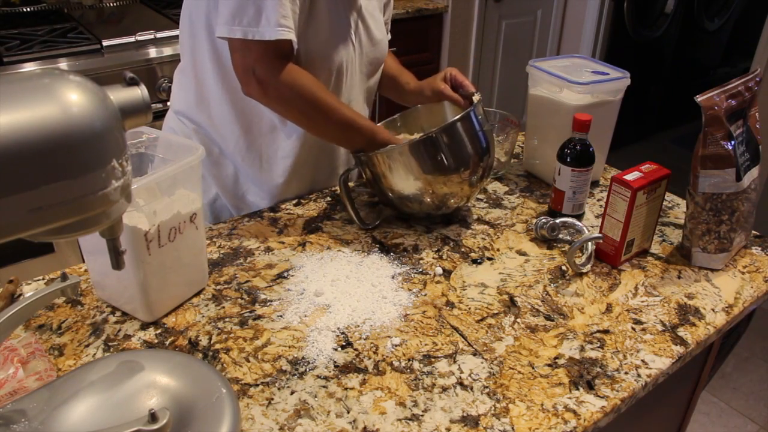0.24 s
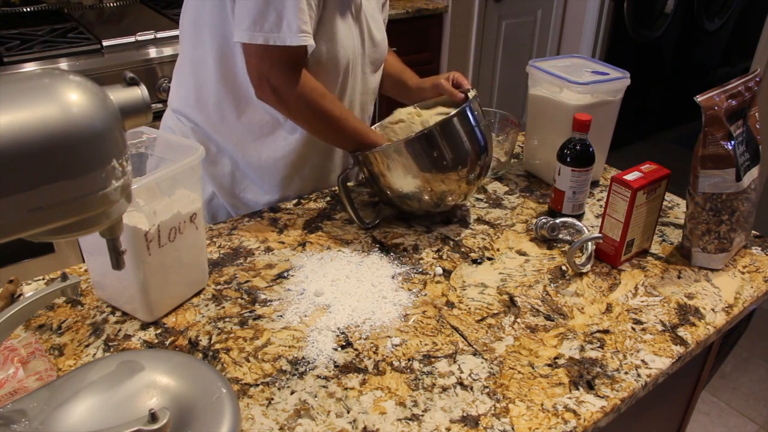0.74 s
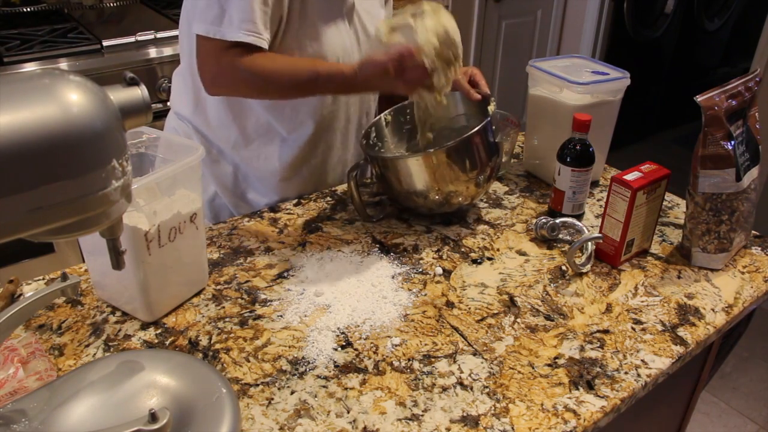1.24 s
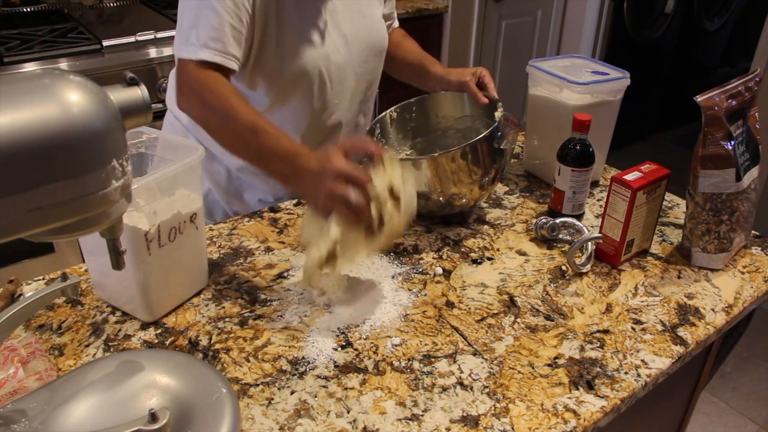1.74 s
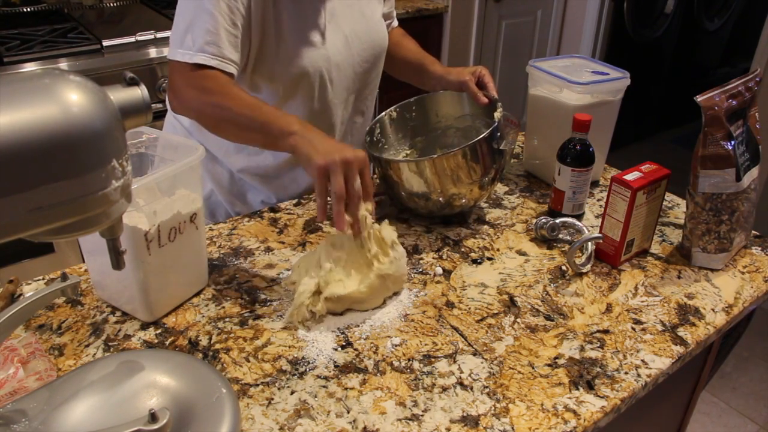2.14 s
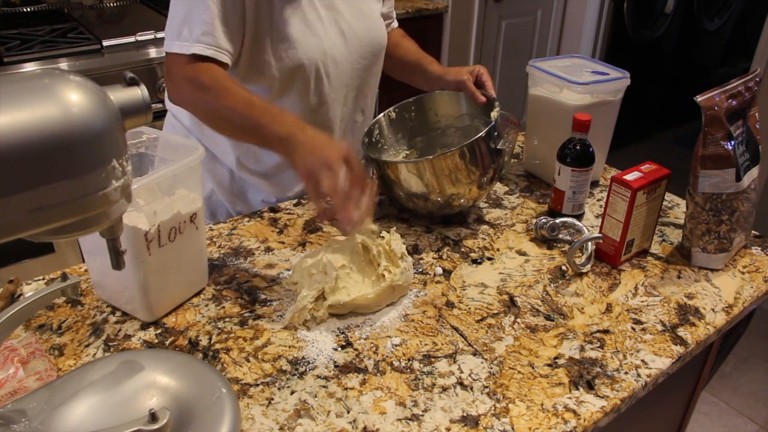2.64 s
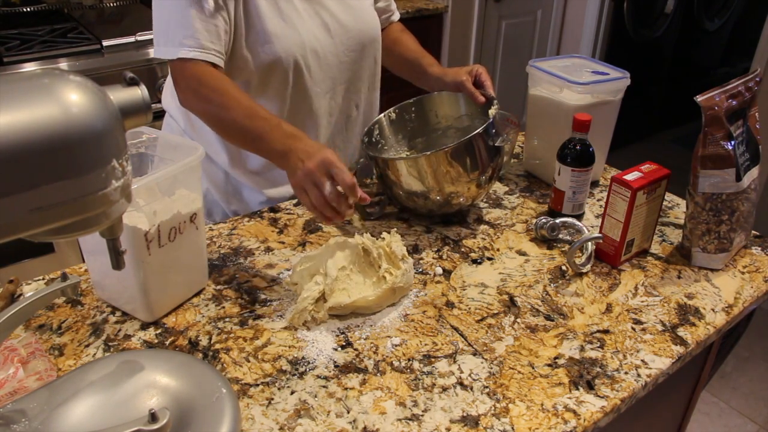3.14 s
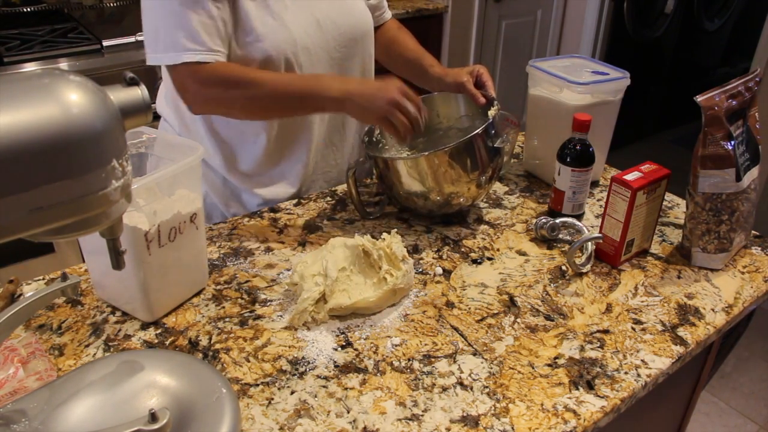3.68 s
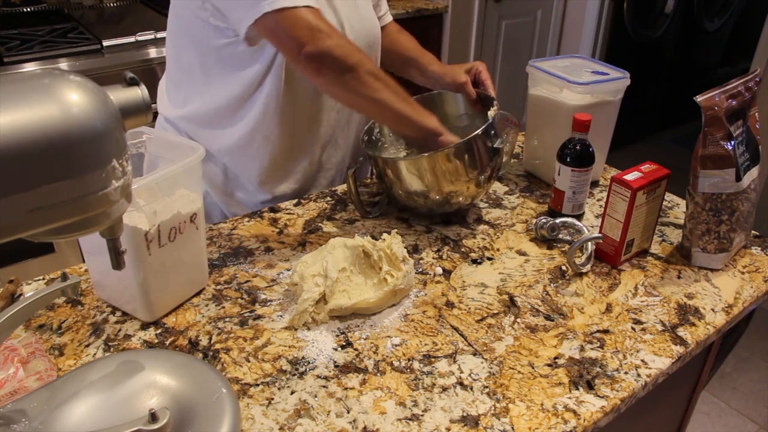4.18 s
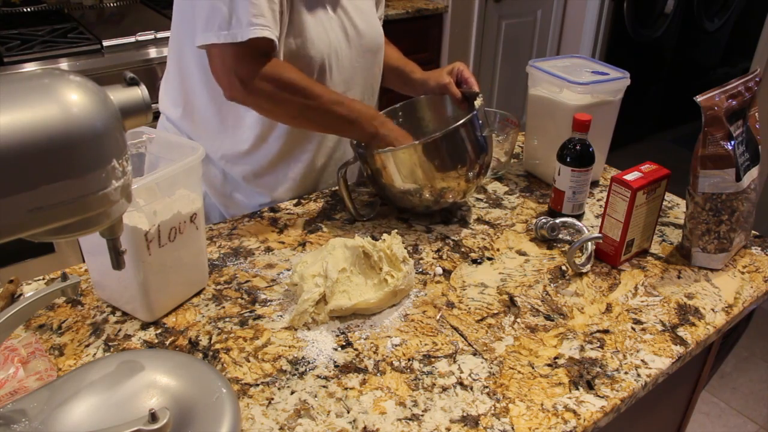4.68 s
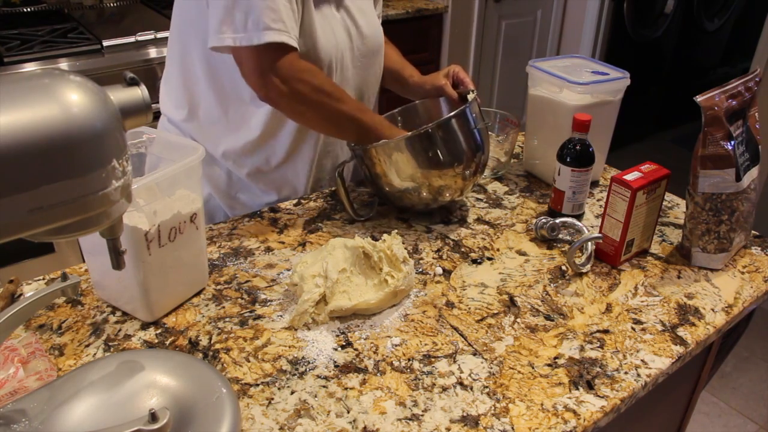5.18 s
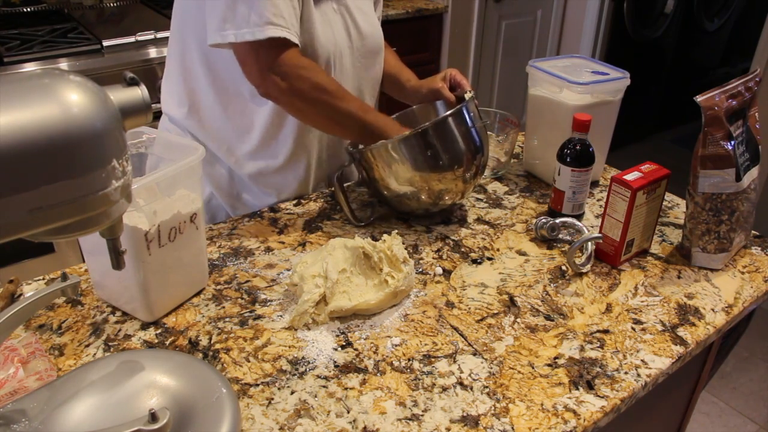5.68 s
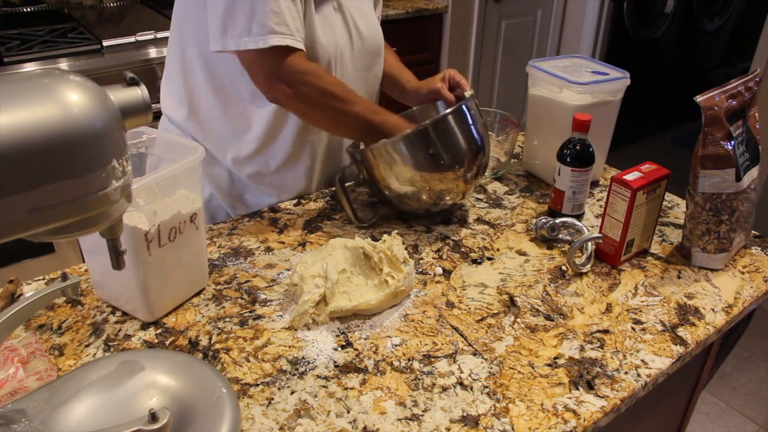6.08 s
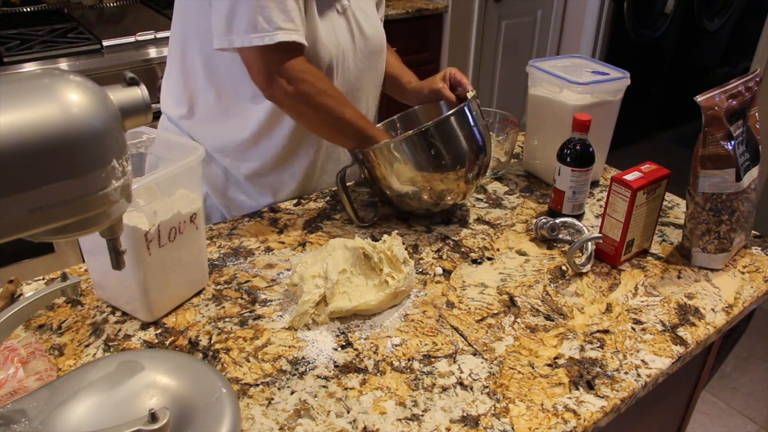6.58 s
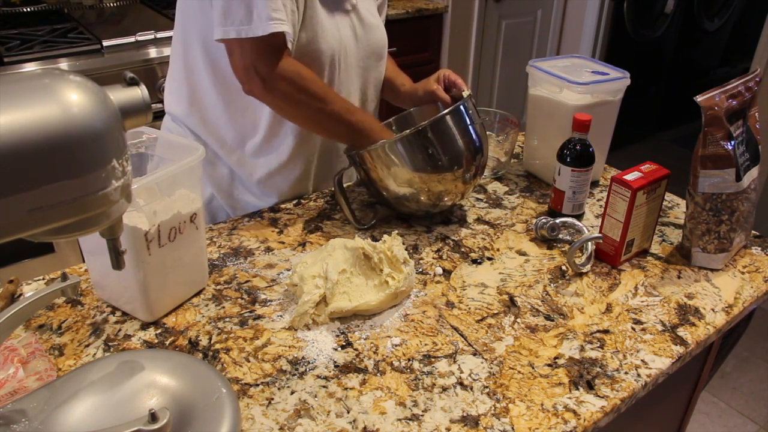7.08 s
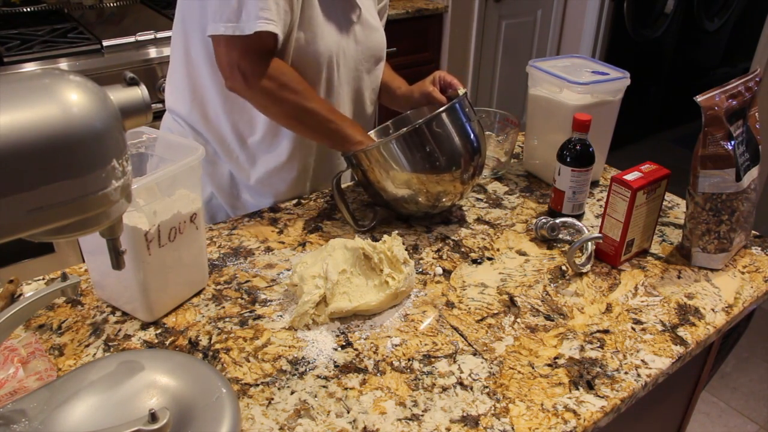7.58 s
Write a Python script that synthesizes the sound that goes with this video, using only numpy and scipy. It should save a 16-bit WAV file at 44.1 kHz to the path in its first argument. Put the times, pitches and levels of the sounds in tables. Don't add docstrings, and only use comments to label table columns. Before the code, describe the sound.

A close, nearly mono pickup in a hard kitchen with about half a second of reverberation, over low appliance hum and soft hiss. At 0 s a hollow bowl knock is already ringing off. From 0.2 to 0.6 s the steel bowl rolls faintly while fingers rub and squeak. At 0.96 s comes the loudest deep, hollow thud, with handle clinks and quick bounces, knocking again at 1.03 s. Dough slaps softly at 1.9 s. A sticky pluck and light double knock follow at 2.4 s, then quiet with a low air puff at 3 s. A muted knock lands at 4.3 s, then rubbing, small squeaks and foot grinding until 5.8 s, including a soft knock at 5.6 s. At 6.16 s a bright, hard steel clang breaks into several tumbling thuds; another hollow double knock hits at 6.6 s, a dull bump at 6.9 s, then faint rubbing fades into hum.

```python
import sys
import numpy as np
from scipy import signal
from scipy.fft import rfft, irfft, next_fast_len
from scipy.io import wavfile
from scipy.ndimage import uniform_filter1d

SR = 44100
rng = np.random.default_rng(int(sys.argv[2]) if len(sys.argv) > 2 else 0)


def waveform_to_disk(signal):
    frames = np.transpose(np.atleast_2d(signal))
    scaled = np.clip(frames, -1, 1) * 32767
    samples = np.round(scaled).astype(np.int16)
    wavfile.write(sys.argv[1], SR, samples)


def nominal_scale(level):
    x = np.asarray(level, float) / 20
    return 10 ** x


N = 344975
EARLY = SR // 10

# [f/Hz, level/dB per Hz]
ROOM_TONE = [(32, -31), (55, -9), (93, -21.5), (107, -10.5), (129, 1), (152, -7.5), (288, -7.5),
             (317, -9.5), (340, -5), (411, -12.5), (586, -16.5), (629, -20.5), (675, -18), (1440, -25),
             (15700, -30)]
# [f/Hz, level/dB per Hz]
PORT_HISS = [(18, -32), (30, 4.5), (461, -1.5), (666, -1), (780, -2), (3490, -2.5), (8080, -2.5),
             (14800, -1.5), (16000, -22)]
# [f/Hz, width/Hz, level/dB]
APPLIANCE_TONES = [(126.4, 16, -65.5), (291.2, 14, -66.5), (584, 8.1, -70), (15734, 1, -74)]
# (f/Hz, level/dB rms)
MOTOR_HUM = (126, -59)
# [t/s, level/dB, hold/s]
ARM_GUSTS = [
    (0, -64, .15),
    (1.1, -61, 0.54),
    (3.01, -49, .03),
    (3.68, -66, .2),
    (4.7, -60, 0.11),
    (5.3, -59, .1),
    (7.17, -56, .2),
]
# [f/Hz, t60/s]
ROOM_DECAY = [(100, 0.37), (400, 0.52), (1000, 0.52), (2500, 0.56), (5000, 0.48), (10000, 0.44)]
# [f/Hz, level/dB]
ROOM_LEVEL = [(100, -5), (400, -10), (1000, -5.5), (2500, -9.5), (5000, -8), (10000, -7.5)]
# [f/Hz, level/dB]
ROOM_SIDE = [(100, -41), (400, -78), (1000, -70.5), (4000, -31), (10000, -45)]
# [t/s, level/dB, hold/s]
FOOT_ROLLS = [(.26, -46.5, 0.0092), (.43, -60, .01), (.576, -51, .01), (.674, -50.5, 0.032),
              (.93, -48, .01), (4.33, -48, 0.0092), (4.4, -55.5, 0.14), (4.59, -51, 0.11),
              (4.896, -59, .01), (4.984, -45, 0.0078), (5.29, -38, 0.012), (5.422, -48.5, .01),
              (5.6, -58, .01), (5.693, -37.5, .01), (5.77, -47.5, 0.0093), (6.9, -55, .02),
              (7.146, -59, .01), (7.25, -64, .05)]
# [t/s, level/dB, hold/s]
FINGER_RUBS = [
    (.22, -60.5, 0.14),
    (.49, -52.5, .01),
    (.674, -56.5, 0.009),
    (.88, -60, 0.058),
    (4.352, -67, .05),
    (4.614, -63, .01),
    (5.274, -69, .01),
    (5.43, -69, .13),
    (5.693, -63, .01),
    (7, -60.5, 0.13),
]
# [t/s, length/s, f/Hz, level/dB rms, octave/dB]
FINGER_SQUEAKS = [(.26, 0.055, 940, -54, -20), (0.289, 0.11, 1400, -51, -23),
                  (0.335, 0.059, 1850, -57, -20), (0.405, .05, 1220, -56, -13),
                  (0.45, 0.12, 1296, -51.5, -9), (4.525, .05, 900, -57.5, -20),
                  (4.663, 0.076, 847, -54.5, -7), (5.671, 0.06, 1760, -50, -25),
                  (5.676, 0.1, 980, -54.5, -20), (5.268, 0.037, 1820, -60, -20),
                  (7.06, 0.07, 1290, -61, -7)]
# [t/s, level/dB, hold/s]
SKIN_SLIDES = [(.5, -62, .06), (.684, -60, .02), (.9, -59, 0.043), (1.834, -59, .01), (3.28, -67, 0.074),
               (4.2, -62, .08), (4.344, -56.5, .02), (5, -66, .12), (5.232, -64, .05), (5.976, -51, 0.0063),
               (7.01, -58.5, .01), (7.128, -59, .01)]
# [f/Hz, width/Hz, level/dB]
SKIN_COLOUR = [(6900, 1100, 3), (7800, 4000, 9)]
# [t/s, peak level/dB]
DOUGH_SLAPS = [
    (1.914, -42),
    (1.921, -48),
    (1.941, -34),
    (1.946, -33),
]
# [t/s, peak level/dB, f/Hz, t60/s]
SINGLE_RINGS = [(-.03, -25, 2200, 0.037), (2.405, -30, 2180, .025), (1.945, -41, 2900, .015),
                (2.406, -33, 1090, .09), (6.607, -19, 275, .05), (6.607, -22, 590, .04),
                (6.62, -24, 960, .03), (-.03, -13, 614, 0.035), (0.9715, -42, 3580, 0.018),
                (0.9835, -40, 3620, 0.018), (2.4045, -25, 742, 0.042), (2.41, -23, 272, .06),
                (4.272, -32, 2650, 0.018), (4.272, -40, 3620, 0.019), (4.617, -48, 1990, .05),
                (6.1645, -20, 5060, .012), (6.166, -21, 4900, .02), (6.876, -51, 1780, 0.026),
                (7.29, -51, 714, 0.073)]
# [t/s, peak level/dB]
HANDLE_CLINKS = [
    (0.959, -21.5),
    (0.9596, -17.5),
    (0.9728, -25),
    (0.9852, -31),
    (1.025, -36),
    (6.164, -29),
    (6.199, -34),
    (6.6085, -31),
]
# [f/Hz, level/dB, t60/s]
HANDLE_MODES = [(6180, -0.5, 0.013), (6540, 0.5, 0.015), (6960, -0.5, 0.01), (7670, -2, 0.0091),
                (8240, -4.5, .008), (9220, -8.5, 0.0074), (10900, -12, 0.0064)]
# [t/s, peak level/dB, centre f/Hz, width/octaves, t60/s]
CONTACT_CRACKS = [(-.03, -10.5, 444, 2.6, 0.018), (0.9568, -21, 1470, 0.81, 0.023),
                  (1.0242, -19, 1520, 0.63, 0.053), (2.4046, -31, 700, 1.5, 0.025),
                  (4.272, -45, 900, 2.4, 0.017), (5.622, -45, 1200, 1.2, .015),
                  (6.163, -13.5, 2500, 2.94, 0.028), (6.163, -33, 12000, 1.1, .012),
                  (6.198, -25.5, 3000, 2.4, 0.024), (6.605, -34, 5000, 1.6, 0.034),
                  (6.619, -27, 2200, 0.85, 0.03), (6.874, -40, 600, 1.6, 0.014),
                  (6.1635, -15, 5100, .15, .022), (6.1635, -25, 7500, .8, .02), (.959, -28, 8500, .9, .012),
                  (3.519, -39, 7700, .3, .008), (7.004, -42, 11500, .6, .012),
                  (1.4664, -40, 5300, .3, .009), (1.496, -39.5, 5100, .3, .009),
                  (2.4045, -44, 4500, .6, .012)]
# [t/s, peak level/dB, strongest low wall mode f/Hz, lower middle level/dB, upper middle level/dB]
RIM_CLANGS = [(-.03, -18, 913, -16, -22), (0.9575, -30, 1273, 0, -13), (1.0245, -27.5, 1276, -1, -23),
              (1.040, -24, 930, -29, -20), (2.4045, -30, 1058, -5, -13), (2.414, -33, 1040, -4, -10),
              (4.272, -42, 980, -9, -15), (5.6235, -38.5, 956, -13, -22), (6.163, -10.5, 1006, -1.5, 2),
              (6.180, -18.5, 1022, -16, -2), (6.198, -22, 1072, -22, -10), (6.606, -29, 960, -9, -11),
              (6.619, -24, 962, -9, -5), (6.874, -53, 960, 3, -14)]
# [ratio to strongest low mode, level/dB, t60/s]
LOW_WALL_MODES = [(1, 2.5, 0.062), (0.761, -2.5, 0.039), (1.06, -3, 0.052), (1.2, -4.5, 0.036),
                  (0.584, -2.5, 0.063)]
# [f/Hz, level/dB, t60/s]
LOWER_MID_MODES = [(1635, -2.5, 0.051), (1805, 1.5, 0.05), (1435, 2.5, 0.018)]
# [f/Hz, level/dB, t60/s]
UPPER_MID_MODES = [(2246, 2.5, 0.041), (2395, -5.5, 0.066), (2650, -7.5, 0.063), (3000, -10, 0.036),
                   (2100, -10, 0.043)]
# [f/Hz, level/dB, t60/s]
TOP_WALL_MODES = [(3740, -9, 0.018), (4850, -16, 0.025), (4960, -1.5, 0.031), (5070, 10, 0.016),
                  (5300, -13, .015), (5630, -7, 0.014)]
# [t/s, peak level/dB, hollow note f/Hz, low counter thump level/dB]
FOOT_THUDS = [(-.03, -11, 444, -3.5), (0.248, -35.5, 417, -14), (0.284, -39, 430, -20),
              (0.9572, 1, 358, -19.5), (0.9707, -7.5, 394, -21), (0.9829, -10, 381, -20),
              (0.9944, -14.5, 415, -28), (1.024, -15, 404, -10), (1.038, -11, 389, -11),
              (2.4049, -21, 435, -18), (2.4129, -22.5, 340, -7), (2.429, -27.5, 470, -8),
              (4.272, -18.5, 423, -14), (4.283, -25.5, 418, -15), (5.6237, -21.5, 425, -33),
              (5.633, -36, 412, -20), (6.1628, -5, 418, -29), (6.169, -10, 453, -15),
              (6.197, -14, 330, -2.5), (6.2077, -16, 386, -15), (6.2154, -11, 446, -8),
              (6.222, -11.5, 440, -9), (6.6054, -11, 363, -5.5), (6.6181, -15, 426, -13),
              (6.875, -33.5, 320, 2.5)]


def rms_one(x):
    return x / np.sqrt(np.mean(x ** 2) + 1e-20)


def at_hz(points, hz):
    table_hz, values = np.array(points)[:, 0], np.array(points)[:, 1]
    return np.interp(np.log(np.maximum(hz, 1)), np.log(table_hz), values)


def coloured(spectrum):
    size = next_fast_len(N)
    hz = np.arange(size // 2 + 1) * SR / size
    bins = rfft(rng.standard_normal(size)) * nominal_scale(at_hz(spectrum, hz))
    return rms_one(irfft(bins, size)[:N])


def band_pass(x, low_hz, high_hz):
    return signal.sosfilt(signal.butter(2, [low_hz, high_hz], "band", fs=SR, output="sos"), x)


def resonate(x, hz, width_hz):
    r = np.exp(-np.pi * width_hz / SR)
    poles = [1, -2 * r * np.cos(2 * np.pi * hz / SR), r * r]
    return signal.lfilter([(1 - r * r) / 2, 0, (r * r - 1) / 2], poles, x)


def strokes(gestures, rise, fall, rest_db):
    t, level_db = np.arange(N) / SR, np.full(N, float(rest_db))
    for s, db, hold in gestures:
        before, after = np.maximum(s - t, 0), np.maximum(t - s - hold, 0)
        level_db = np.maximum(level_db, db - rise * before - fall * after)
    return nominal_scale(uniform_filter1d(level_db, size=600))


def ringing(modes, contact_s):
    t = np.arange(SR // 4) / SR
    wave = sum(nominal_scale(db - 60 * t / max(t60, .004)) * np.sin(2 * np.pi * hz * t) for hz, db, t60 in modes)
    return wave * (1 - np.exp(-t / contact_s))


def struck(modes, db, spread_db):
    blow = []
    for hz, level_db, t60 in modes:
        detune, change = rng.standard_normal(2)
        blow.append((hz * (1 + 0.01 * detune), db + level_db + spread_db * change, t60))
    return blow


def add(out, s, wave):
    start = round(s * SR) + EARLY
    out[start:start + len(wave)] += wave[:len(out) - start]


def background():
    room_tone = nominal_scale(-51.5) * coloured(ROOM_TONE)
    motor_hz, motor_db = MOTOR_HUM
    hum = nominal_scale(motor_db + 2) * np.sin(2 * np.pi * motor_hz * np.arange(N) / SR)
    for hz, width, db in APPLIANCE_TONES:
        noise = rng.standard_normal(N)
        hum += nominal_scale(db) * rms_one(resonate(resonate(noise, hz, width), hz, width))
    rumble = rms_one(band_pass(rng.standard_normal(N), 22, 55))
    return room_tone + hum + rumble * strokes(ARM_GUSTS, rise=49, fall=62, rest_db=-67.5)


def kitchen():
    t = np.arange(SR * 3 // 4) / SR
    tails = np.zeros((2, len(t)))
    onset = np.clip((t - .007) / 0.01, 0, 1)
    edges = 60 * 2 ** np.arange(0, 8.1, .5)
    for low, high in zip(edges, edges[1:]):
        hz = np.sqrt(low * high)
        band = band_pass(rng.standard_normal(tails.shape), low, high)
        fade = nominal_scale(-60 * t / at_hz(ROOM_DECAY, hz)) * onset
        level_db = at_hz(ROOM_LEVEL, hz) + np.array([[0], [at_hz(ROOM_SIDE, hz)]])
        tails += band * fade / np.sqrt(np.sum(fade ** 2)) * nominal_scale(level_db)
    return tails


def grains():
    strength = nominal_scale(2.7 * rng.standard_normal(N // 200 + 1)).repeat(200)[:N]
    return rng.standard_normal(N) * strength


def skin_sliding():
    friction, hiss = grains(), np.zeros(N)
    for hz, width, db in SKIN_COLOUR:
        hiss += nominal_scale(db) * rms_one(resonate(resonate(friction, hz, width), hz, width))
    return rms_one(hiss) * strokes(SKIN_SLIDES, rise=247, fall=223, rest_db=-80)


def finger_rubbing():
    return rms_one(resonate(grains(), 1400, 1900)) * strokes(FINGER_RUBS, rise=200, fall=220, rest_db=-85)


def finger_squeaking():
    out, friction = np.zeros(N), grains()
    for s, length, hz, db, octave_db in FINGER_SQUEAKS:
        start, size = round(s * SR), round(length * SR)
        slips = friction[start:start + size]
        note = rms_one(resonate(resonate(slips, hz, 200), hz, 200))
        octave = nominal_scale(octave_db) * rms_one(resonate(slips, 2 * hz, 200))
        out[start:start + size] += nominal_scale(db) * (note + octave) * np.sqrt(np.hanning(size))
    return out


def bowl_rolling():
    hollow = rms_one(resonate(resonate(grains(), 420, 58), 400, 117))
    return hollow * strokes(FOOT_ROLLS, rise=402, fall=224, rest_db=-76)


def dough_slaps(out):
    modes = [(hz, 0, 20.0 / hz) for hz in np.geomspace(550, 3100, 8)]
    for s, db in DOUGH_SLAPS:
        add(out, s, ringing(struck(modes, db - 9.5, 4.1), 0.00018))


def single_rings(out):
    for s, db, hz, t60 in SINGLE_RINGS:
        modes = [(hz, db, t60), (hz * .84, db - 13.0, t60), (hz * 1.3, db - 14, t60)]
        add(out, s, ringing(modes, 0.00094))


def handle_clinks(out):
    for s, db in HANDLE_CLINKS:
        add(out, s, ringing(struck(HANDLE_MODES, db - 3, 2.4), 0.00049))


def contact_cracks(out):
    t = np.arange(EARLY) / SR
    for s, db, hz, octaves, t60 in CONTACT_CRACKS:
        low, high = np.minimum(hz * 2 ** (octaves * np.array([-.5, .5])), .45 * SR)
        burst = band_pass(rng.standard_normal(len(t)) * nominal_scale(-60 * t / t60), low, high)
        add(out, s, nominal_scale(db) * burst / np.abs(burst).max())


def rim_clangs(out):
    bare_steel_db, top_gain_per_db = -17, 2.5
    for s, db, hz, lower_db, upper_db in RIM_CLANGS:
        top_db = -25 + top_gain_per_db * max(db - bare_steel_db, 0)
        low_modes = [(hz * ratio, level_db, t60) for ratio, level_db, t60 in LOW_WALL_MODES]
        modes = struck(low_modes, db - 3.5, 0.81)
        modes += struck(LOWER_MID_MODES, db + lower_db - 3, 2.0)
        modes += struck(UPPER_MID_MODES, db + upper_db - 5.5, 2.4)
        modes += struck(TOP_WALL_MODES, db + top_db - 8, 1.3)
        add(out, s, ringing(modes, 0.00043))


def foot_thuds(out):
    for s, db, hz, low_db in FOOT_THUDS:
        t60 = 0.025 - .0011 * db
        hollow = [(hz, db + 4.5, t60), (hz * 0.73, db - 8.5, t60), (hz * 1.3, db - 22, t60 * 0.59)]
        counter = [(212.5, db + low_db, 0.044), (147, db + low_db - 5.5, 0.052)]
        add(out, s, ringing(hollow + counter, 0.002))


def scene():
    near = np.zeros(N + EARLY)
    for blows in (dough_slaps, single_rings, handle_clinks, contact_cracks, rim_clangs, foot_thuds):
        blows(near)
    handling = skin_sliding() + finger_rubbing() + finger_squeaking() + bowl_rolling()
    near[EARLY:] += handling * nominal_scale(-1.5)
    near = signal.sosfilt(signal.butter(3, 95, "high", fs=SR, output="sos"), near)
    mid, side = signal.fftconvolve(near[None], kitchen(), axes=1)[:, EARLY:len(near)]
    mid = mid + near[EARLY:] + background()
    side = side + nominal_scale(-59) * coloured(PORT_HISS)
    return np.array([mid + side, mid - side])


def top_cut(x):
    return signal.sosfilt(signal.butter(12, 16470, fs=SR, output="sos"), x)


def record(dry):
    cut = signal.sosfilt(signal.ellip(8, .5, 30, 15830, fs=SR, output="sos"), dry)
    mix = 1.639 * np.tanh(cut / 1.56)
    return top_cut(mix)


dry = scene()
out = record(dry)
waveform_to_disk(out)
```